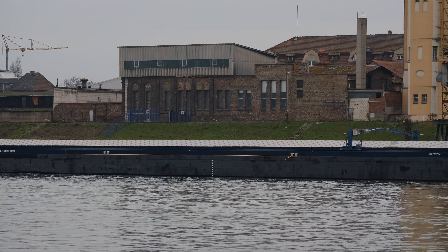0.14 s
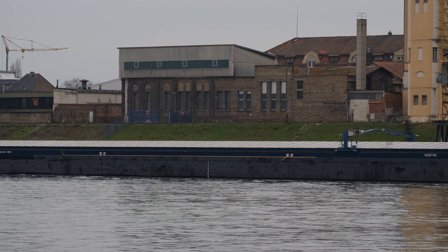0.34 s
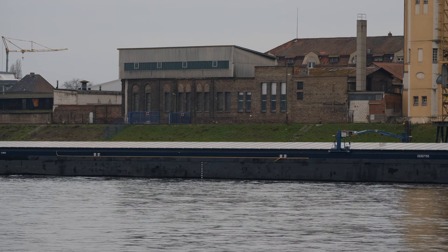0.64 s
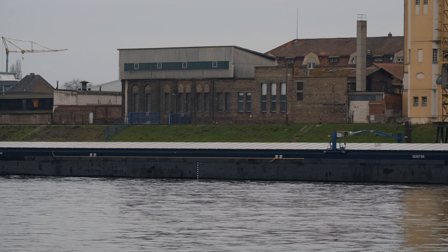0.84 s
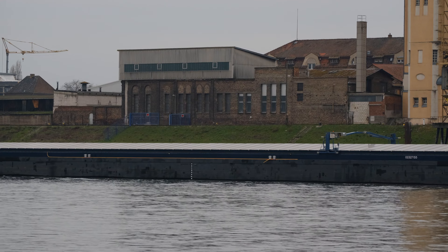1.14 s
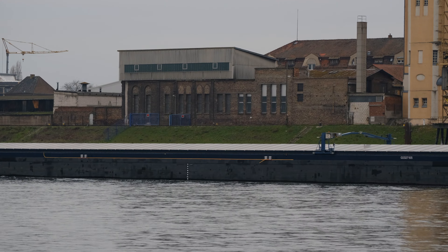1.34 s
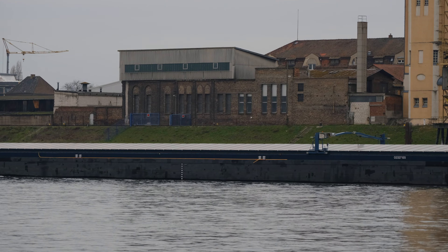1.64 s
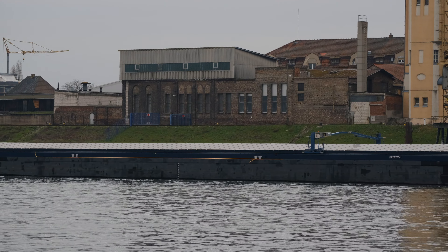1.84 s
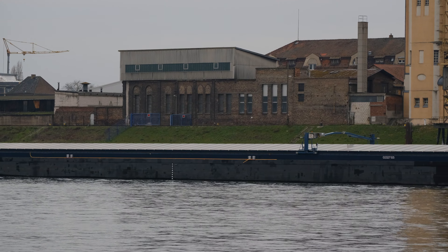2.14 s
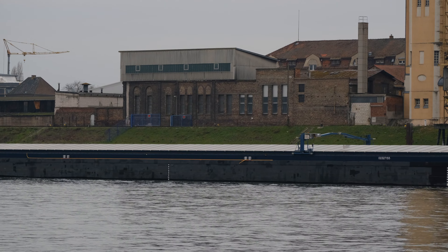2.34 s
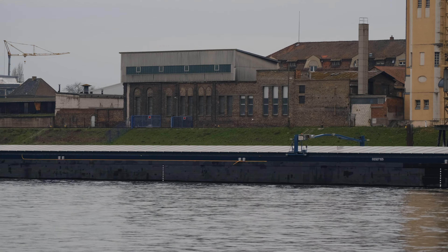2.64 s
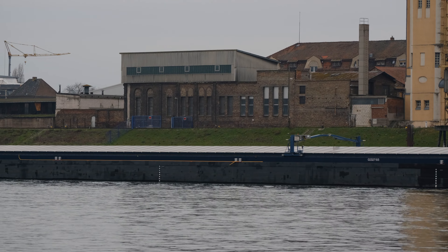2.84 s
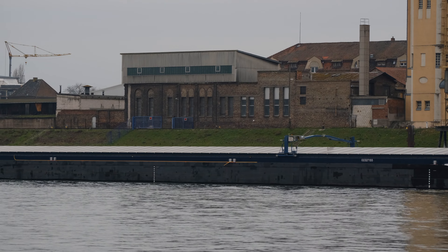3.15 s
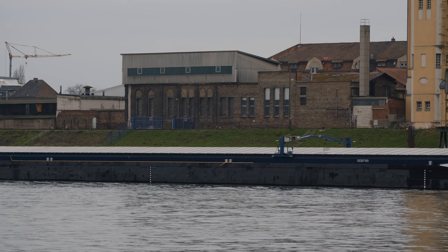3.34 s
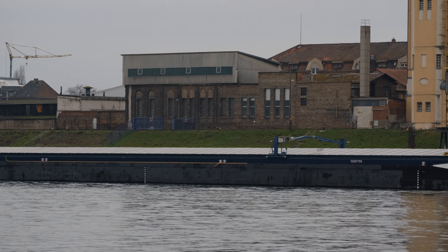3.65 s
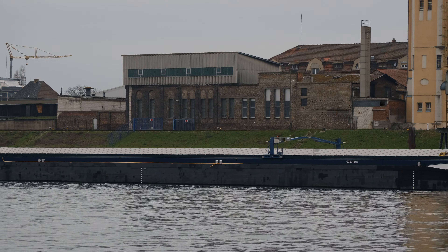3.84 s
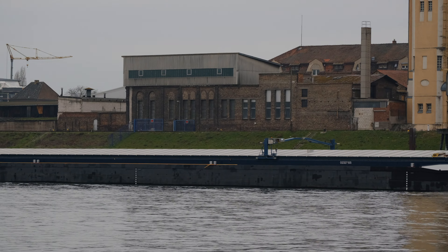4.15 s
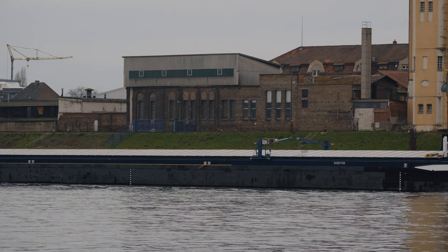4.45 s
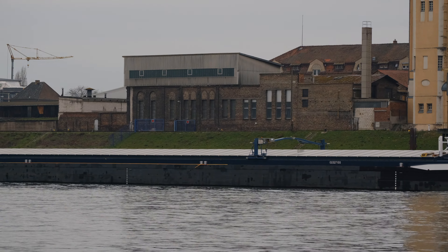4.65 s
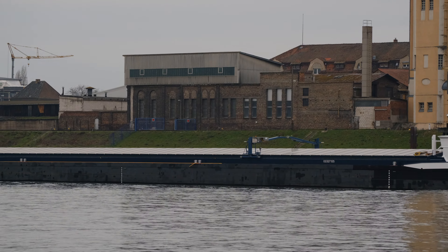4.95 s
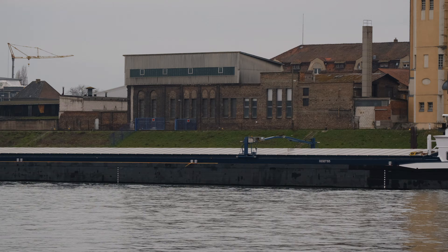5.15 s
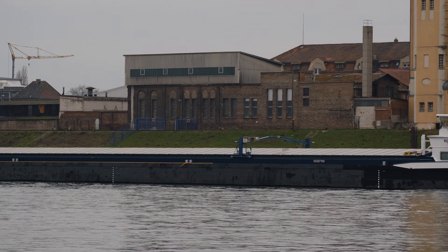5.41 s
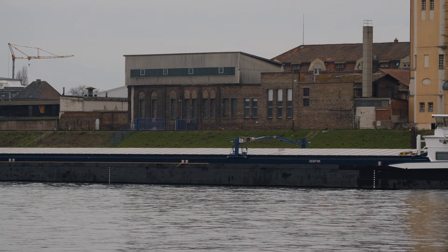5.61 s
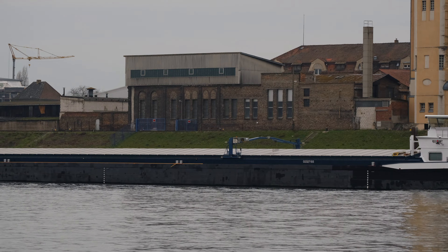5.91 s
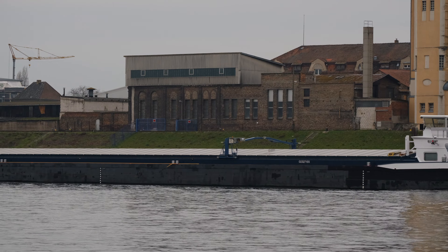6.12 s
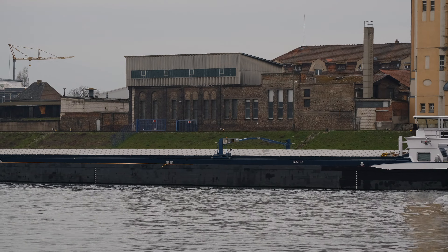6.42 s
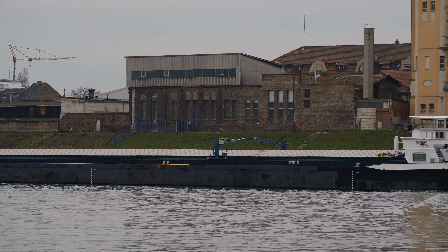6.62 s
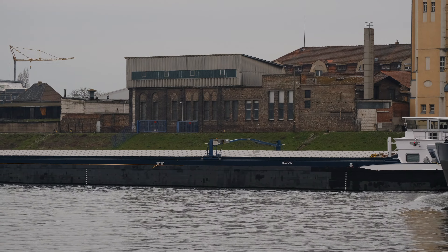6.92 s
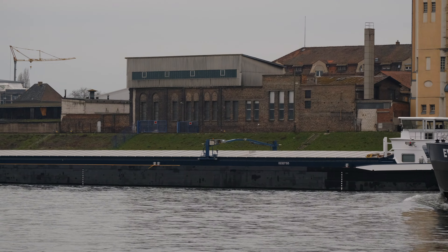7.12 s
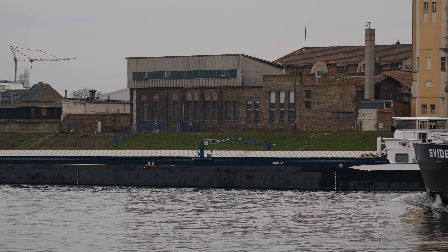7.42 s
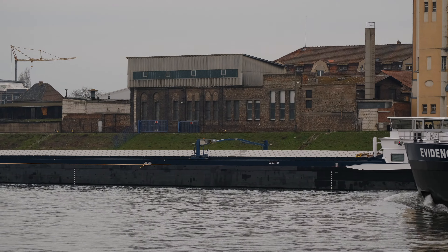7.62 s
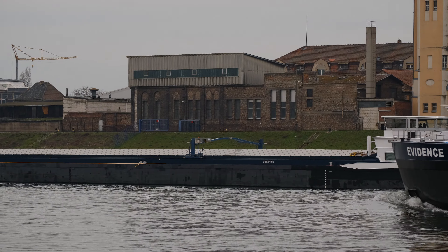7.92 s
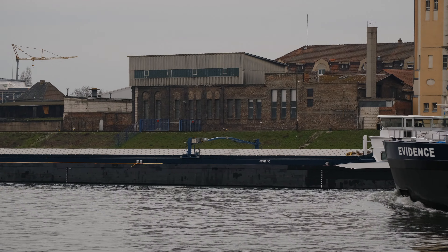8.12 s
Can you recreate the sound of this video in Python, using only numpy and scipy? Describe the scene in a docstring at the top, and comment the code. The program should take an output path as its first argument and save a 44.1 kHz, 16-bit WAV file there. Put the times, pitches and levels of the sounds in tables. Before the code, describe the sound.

Large cargo ships pass on a wide river, heard from the bank. A slow heavy diesel and a faster one drone together with low exhaust roar, a steady generator hum and hollow, muffled engine-room din. Soft water wash lies above. The faster engine comes forward around three seconds, and bow-wave noise slowly rises to the end. Outdoor stereo, with centred bass and wider water.

```python
"""A slow eight-cylinder ship's diesel drones against a faster six-cylinder one as two cargo ships pass on
a wide river, heard from the bank through two close microphone ports. Engines are sums of cycle orders;
a generator and thin gear whines are wavering tones. Exhaust roar, engine-room din, wash and a growing
bow wave are coloured noise, and hollow resonances of exhaust and hull are narrow bands of noise."""
import sys
import numpy as np
from scipy import signal
from scipy.fft import irfft, next_fast_len
from scipy.io import wavfile

SR = 44100
rng = np.random.default_rng(int(sys.argv[2]) if len(sys.argv) > 2 else 0)


def bounce(signal):
    """Save signal as a 16-bit WAV file at the path given by the first command-line argument."""
    frames = np.transpose(np.atleast_2d(signal))
    limited = np.clip(frames, -1, 1)
    pcm = np.round(limited * 32767).astype(np.int16)
    wavfile.write(sys.argv[1], SR, pcm)


N = 364707
TIME = np.arange(N) / SR  # s

# engines: working cycles per second, cylinders, time of the first firing
SLOW_CYCLE_HZ, SLOW_CYLINDERS, SLOW_FIRST_S = 4.2509, 8, .0050
FAST_CYCLE_HZ, FAST_CYLINDERS, FAST_FIRST_S = 13.0667, 6, .0039
# harmonics of each working cycle: order, level before the carry/dB
SLOW_ORDERS = [(5, -62), (7, -54), (8, -45), (10, -60), (11, -46), (13, -45), (14, -58), (15, -50),
               (16, -39.3), (19, -54), (20, -52), (21, -58), (22, -58), (27, -59), (28, -57)]
FAST_ORDERS = [(2, -68), (3, -59), (4, -60), (6, -37), (7, -47), (8, -54), (9, -52), (11, -55), (12, -59),
               (15, -53), (16, -57), (18, -55), (19, -59)]
# how each engine carries to the bank: t/s, gain of firing orders/dB, gain of uneven-cylinder orders/dB
SLOW_CARRY = [(0, -2, 1), (1.6, 1, 0), (3.8, 0, -5), (6.6, 0, 0), (8.27, 2, 1)]
FAST_CARRY = [(0, -9, -9), (2.8, 2.5, -3), (3.7, -1, -1), (5.7, -.5, 2), (8.27, -1.5, 0)]

GENERATOR_HZ, GENERATOR_DB, GENERATOR_WAVER_DB = 50.17, -43.5, .8
# thin gear whines: f/Hz, level/dB, phase by which the right port leads/rad
WHINE_TONES = [(549, -65, 1.0), (1003, -66, .6)]
# hollow resonances of exhaust and hull: f/Hz, width at half gain/Hz, settled level/dB, opening offset/dB
HOLLOW_BANDS = [(320, 40, -51, -18), (410, 45, -54.5, -2), (495, 22, -66, 22), (625, 45, -51, -18),
                (700, 40, -54, -8), (770, 30, -56, -2), (860, 50, -66, 13), (1010, 35, -66, 10),
                (1150, 110, -75, 21)]
HOLLOW_SETTLE_S, HOLLOW_WAVER_DB, HOLLOW_WAVER_HZ = 2.86, 2, .6

# noise levels over time: t/s, engine-room din level/dB, wash level/dB
DIN_WASH_LEVELS = [(0, -39.5, -49), (2.9, -42, -50.5), (5.6, -41, -49.5), (8.27, -41.5, -51.5)]
ROAR_DB = -36.8
# bow wave of the nearer ship: level at the end, growth as it closes in
BOW_END_DB, BOW_RISE_DB_PER_S = -47, 1.8
HISS_DB = -80.5
# noise colours of exhaust roar, engine-room din, churned water, bow wave, microphone hiss:
# f/Hz, relative level/dB
ROAR_COLOUR = [(14, -44.5), (22, -22), (40, -16.5), (60, -7.5), (72, -2), (95, 0.5), (128, -1), (142, 0.5),
               (165, 0.5), (205, 2), (245, 0), (285, -1.5), (330, -14), (500, -71.5), (1000, -130)]
DIN_COLOUR = [(190, -37.5), (330, -5), (365, -4), (410, 0), (445, -2.5), (492, -1.5), (555, -4),
              (620, -2.5), (720, -3), (774, -2.5), (1000, -6.5), (1400, -19), (1820, -39.5), (3080, -120)]
WASH_COLOUR = [(820, -39.5), (1400, -2.5), (1750, -1), (2050, -5), (2710, -9.5), (3200, -15), (3620, -14),
               (3940, -17), (4900, -21.5), (5800, -24.5), (7000, -31), (9000, -38), (11700, -68.5),
               (19800, -120)]
BOW_COLOUR = [(300, -58), (600, -5.5), (900, -5), (1150, 0), (1400, -5.5), (1800, -26.5), (4000, -100)]
HISS_COLOUR = [(3000, -59.5), (9000, 1), (10100, 1), (12200, -2.5), (13100, 0), (13700, 0.5), (14100, -2.5),
               (15000, -1.5), (15700, -7.5)]

# sound common to both ports: f/Hz, share of power (0 to 1)
COMMON_SHARE = [(200, 1), (350, 1), (550, 1), (850, .95), (1150, 0.7), (2800, 0.52), (3300, 0.48),
                (4300, 0.5), (5400, .27), (6200, .4), (7500, 0.24), (9500, 0.34), (11500, .14),
                (15000, .12)]
# balance of the ports: f/Hz, left minus right level/dB
PORT_BALANCE = [(300, 0), (500, -.6), (800, -1.5), (1200, -4), (1600, -3), (2200, -4.5), (2700, -4),
                (3100, 0), (3550, -2), (4000, .5), (6000, -1.5), (7500, .5), (11000, -1), (13700, 3.5),
                (15500, 0)]
# phase between the ports: f/Hz, phase by which left leads (negative: right leads)/rad
PORT_LEAD = [(300, 0), (600, -.15), (1000, -.6), (1400, -.7), (2070, -1.9), (2930, -1.4), (3880, -3.0),
             (5000, -3.3), (5860, -5.3), (6800, -5.3), (9390, -9.2), (12700, -8.9), (15500, -9.5)]
MONO_BELOW_HZ, CUTOFF_HZ, EDGE_FADE_S = 330, 15690, .004


def from_db(db):
    """Turn dB into an amplitude gain."""
    return 10 ** (np.asarray(db) / 20)


def rms_one(x):
    """Scale to rms 1."""
    return x / np.sqrt(np.mean(x ** 2) + 1e-20)


def in_time(rows):
    """Draw each column of a timed table as a curve with one value per sample."""
    s, *columns = np.transpose(rows)
    return [np.interp(TIME, s, column) for column in columns]


def at_hz(points, hz):
    """Read a spectrum by straight lines on a log-frequency axis."""
    point_hz, values = np.transpose(points)
    return np.interp(np.log(hz), np.log(point_hz), values)


def drift(rate_hz):
    """Slow random wander of rms 1: coarse noise through two one-pole low-passes at rate_hz."""
    # one coarse value per 100 samples
    pole = np.exp(-200 * np.pi * rate_hz / SR)
    coarse = rng.standard_normal(N // 100 + 3002)
    slow = signal.lfilter([1], [1, -2 * pole, pole * pole], coarse)
    slow = slow[3000:]  # drop the filter's start-up
    return np.interp(np.arange(N) / 100, np.arange(len(slow)), rms_one(slow))


def port_noise(gain_at):
    """Noise at both ports: a common part, phase-shifted between them, plus a part of each port's own."""
    size = next_fast_len(N)
    hz = np.maximum(np.arange(size // 2 + 1) * SR / size, 1)
    real, imaginary = rng.standard_normal((2, 3, len(hz)))
    common, own_left, own_right = real + 1j * imaginary
    share = np.clip(at_hz(COMMON_SHARE, hz), 0, 1)
    # half the phase and level difference goes to each port
    half_turn = np.exp(.5j * np.interp(hz, *np.transpose(PORT_LEAD)))
    tilt = from_db(at_hz(PORT_BALANCE, hz) / 2)
    left = (np.sqrt(share) * common * half_turn + np.sqrt(1 - share) * own_left) * tilt
    right = (np.sqrt(share) * common / half_turn + np.sqrt(1 - share) * own_right) / tilt
    spectrum = gain_at(hz) * np.array([left, right])
    return rms_one(irfft(spectrum, size)[:, :N])


def coloured(colour):
    """Port noise with a tabled spectrum."""
    return port_noise(lambda hz: from_db(at_hz(colour, hz)))


def diesel(cycle_hz, cylinders, first_s, orders, carry, fade_db, wander):
    """Firing orders peak together at each firing; unequal cylinders fill in the others at random phases."""
    firing_db, uneven_db = in_time(carry)
    cycle_phase = 2 * np.pi * cycle_hz * (TIME - first_s)
    drone = 0
    for order, level_db in orders:
        if order % cylinders == 0:
            gain = from_db(level_db + firing_db)
            phase = 0
        else:
            # these orders fade and shift as the paths over the water change
            phase = rng.uniform(0, 2 * np.pi) + wander * drift(0.35)
            gain = from_db(level_db + uneven_db + fade_db * drift(0.51))
        drone = drone + gain * np.cos(order * cycle_phase + phase)
    return np.sqrt(2) * drone  # table levels are rms


def generator():
    """A steady sine hum whose level wavers slightly."""
    level = from_db(GENERATOR_DB + GENERATOR_WAVER_DB * drift(0.3))
    turns = GENERATOR_HZ * TIME + rng.random()
    return np.sqrt(2) * level * np.cos(2 * np.pi * turns)


def whines():
    """Gear tones that waver in strength and phase, with the right port leading."""
    tones = 0
    for hz, level_db, lead in WHINE_TONES:
        phase = 2 * np.pi * hz * TIME + 2.0 * drift(0.66)
        gain = from_db(level_db + 2.5 * drift(.8))
        tones = tones + gain * np.cos([phase - lead / 2, phase + lead / 2])
    return np.sqrt(2) * tones


def hollows():
    """Noise ringing in each resonance, settling from its opening level and wavering on its own."""
    ringing = 0
    settling = np.exp(-TIME / HOLLOW_SETTLE_S)
    for centre_hz, width_hz, level_db, opening_db in HOLLOW_BANDS:
        waver_db = HOLLOW_WAVER_DB * drift(HOLLOW_WAVER_HZ)
        gain = from_db(level_db + opening_db * settling + waver_db)
        band = port_noise(lambda hz: 1 / (1 + (2 * (hz - centre_hz) / width_hz) ** 2))
        ringing = ringing + gain * band
    return ringing


def exhaust_roar():
    """Low exhaust noise with a slow and a quicker swell."""
    return from_db(ROAR_DB + 0.51 * drift(0.45) + 0.23 * drift(5.5)) * coloured(ROAR_COLOUR)


def din_and_wash():
    """Engine-room din and churned water swell together a little as the air over the river stirs."""
    din_db, wash_db = in_time(DIN_WASH_LEVELS)
    stir = drift(2.5)
    din = from_db(din_db + 0.33 * stir) * coloured(DIN_COLOUR)
    wash = from_db(wash_db + 0.31 * stir + 0.46 * drift(6.1)) * coloured(WASH_COLOUR)
    return din + wash


def bow_wave():
    """Water noise of the nearer ship, rising by a constant number of dB per second."""
    level_db = BOW_END_DB - BOW_RISE_DB_PER_S * (TIME[-1] - TIME)
    return from_db(level_db + 0.71 * drift(3.3)) * coloured(BOW_COLOUR)


def scene():
    """Both engines, the generator, the whines, the resonances and the noises, all from the start."""
    slow = diesel(SLOW_CYCLE_HZ, SLOW_CYLINDERS, SLOW_FIRST_S, SLOW_ORDERS, SLOW_CARRY,
                  fade_db=1.2, wander=.4)
    fast = diesel(FAST_CYCLE_HZ, FAST_CYLINDERS, FAST_FIRST_S, FAST_ORDERS, FAST_CARRY,
                  fade_db=2.5, wander=.9)
    tones = slow + fast + generator() + whines()
    return tones + hollows() + exhaust_roar() + din_and_wash() + bow_wave()


def record(dry):
    """Add microphone hiss, ease the ends, narrow the bass to mono and cut the top."""
    wet = dry + from_db(HISS_DB) * coloured(HISS_COLOUR)
    wet = wet * np.clip(np.minimum(TIME, TIME[::-1]) / EDGE_FADE_S, 0, 1)
    mid, side = (wet[0] + wet[1]) / 2, (wet[0] - wet[1]) / 2
    # filtering both ways keeps mid and side in step
    bass_cut = signal.butter(3, MONO_BELOW_HZ, "high", fs=SR, output="sos")
    side = signal.sosfiltfilt(bass_cut, side)
    top_cut = signal.ellip(12, .1, 40, CUTOFF_HZ, fs=SR, output="sos")
    return signal.sosfiltfilt(top_cut, [mid + side, mid - side])


dry = scene()
out = record(dry)
bounce(out)
```